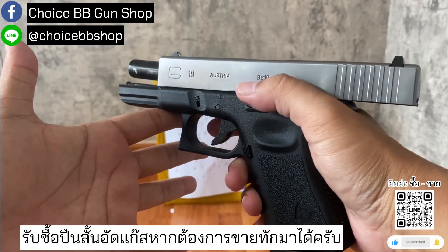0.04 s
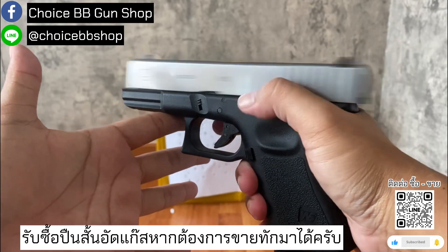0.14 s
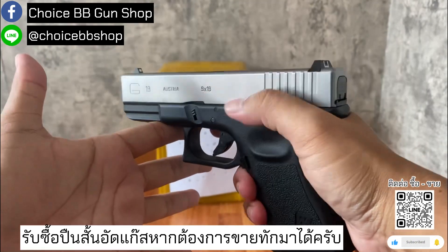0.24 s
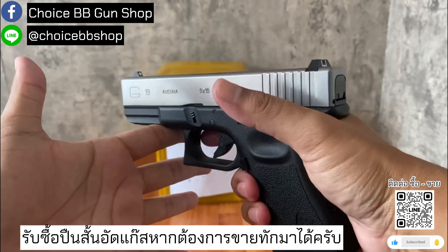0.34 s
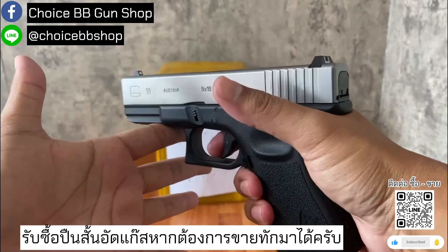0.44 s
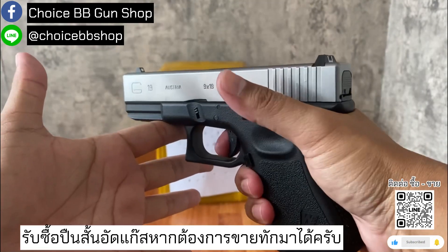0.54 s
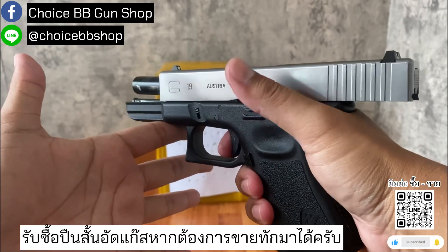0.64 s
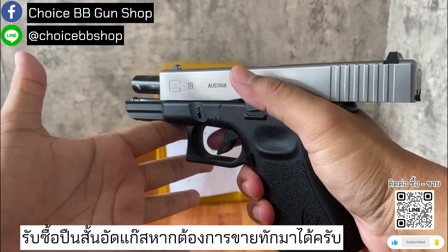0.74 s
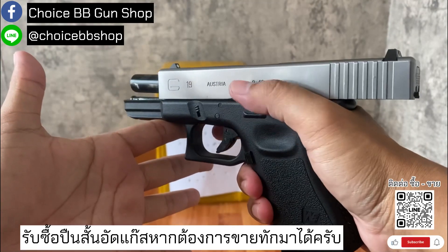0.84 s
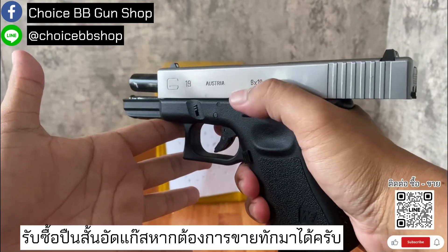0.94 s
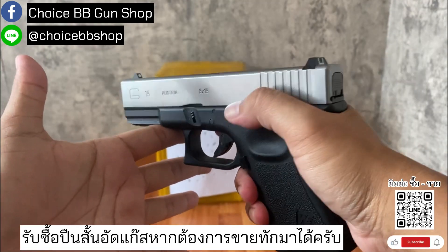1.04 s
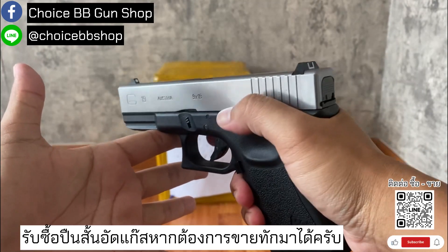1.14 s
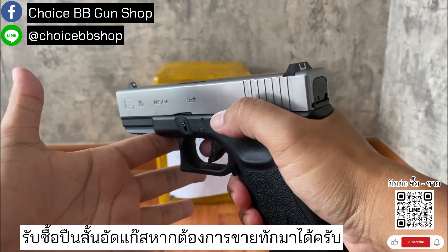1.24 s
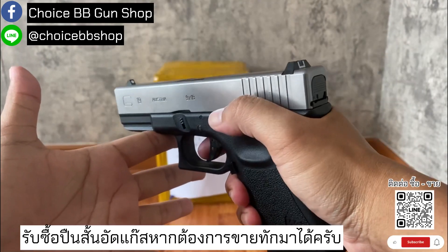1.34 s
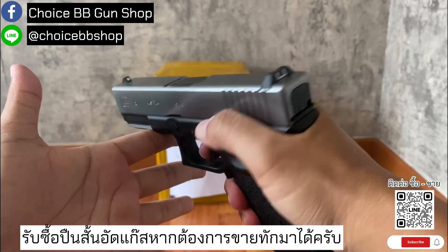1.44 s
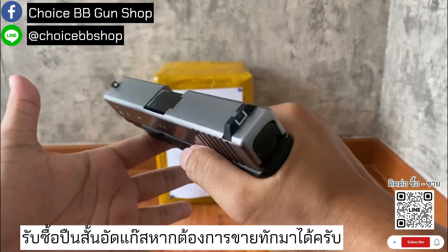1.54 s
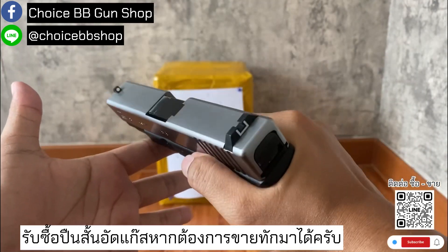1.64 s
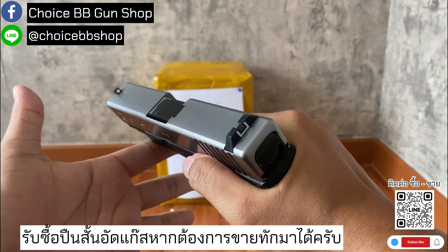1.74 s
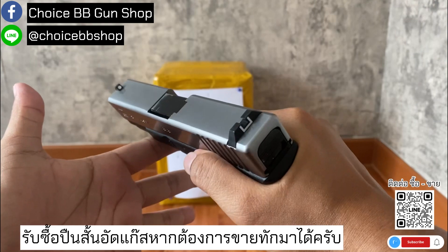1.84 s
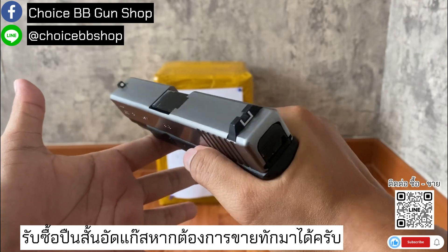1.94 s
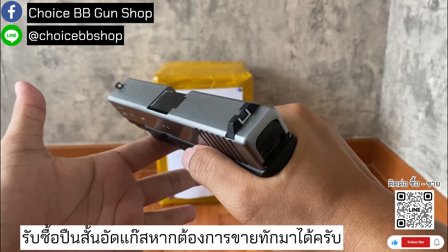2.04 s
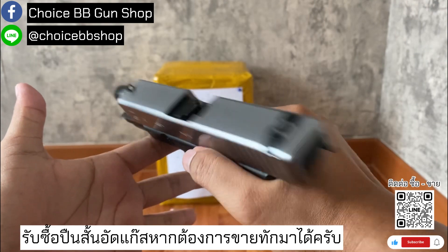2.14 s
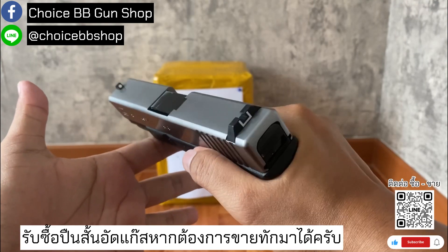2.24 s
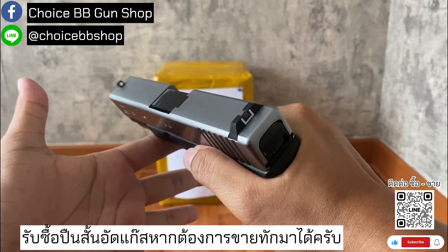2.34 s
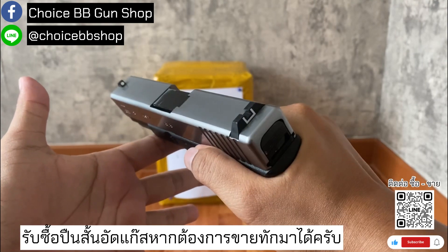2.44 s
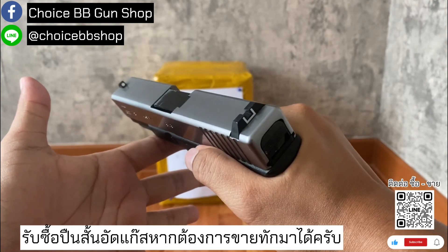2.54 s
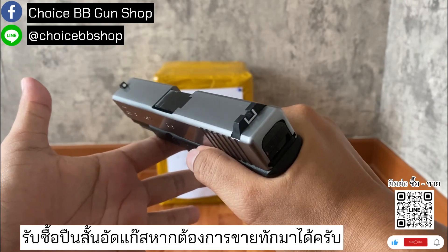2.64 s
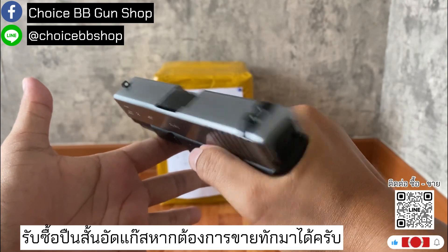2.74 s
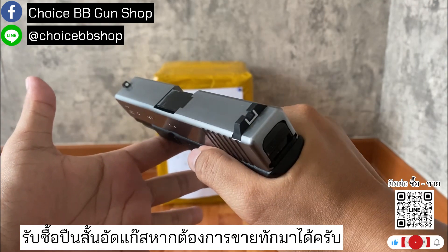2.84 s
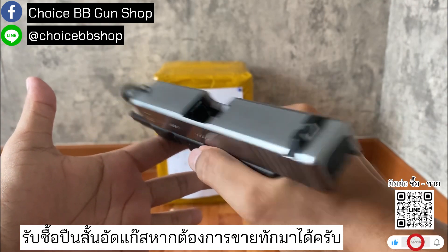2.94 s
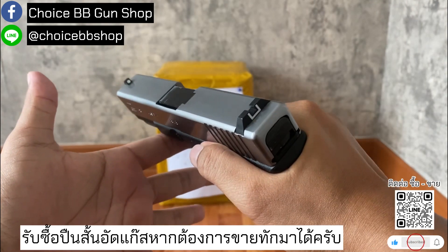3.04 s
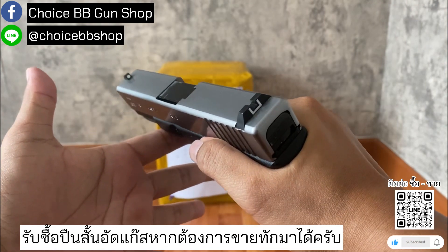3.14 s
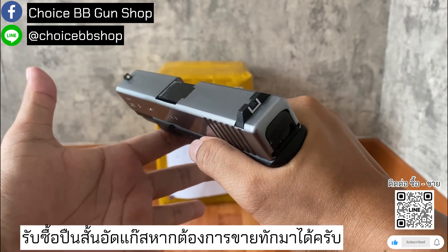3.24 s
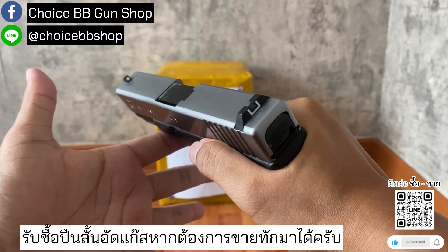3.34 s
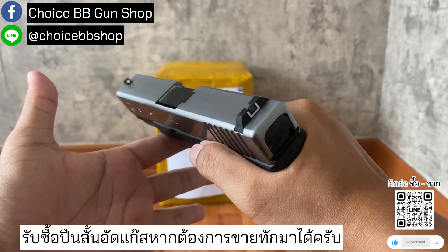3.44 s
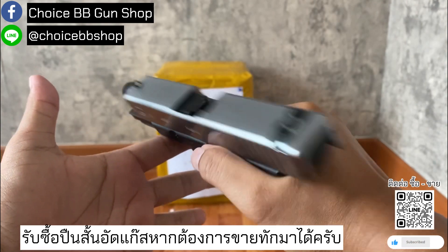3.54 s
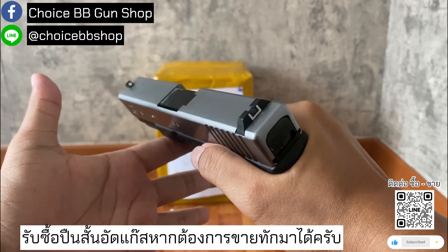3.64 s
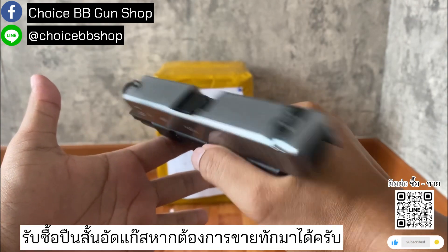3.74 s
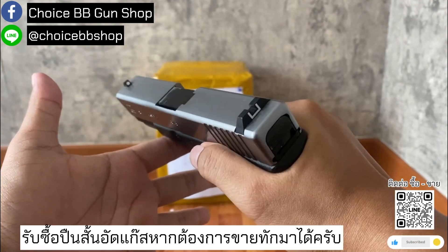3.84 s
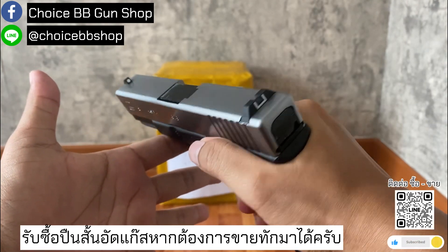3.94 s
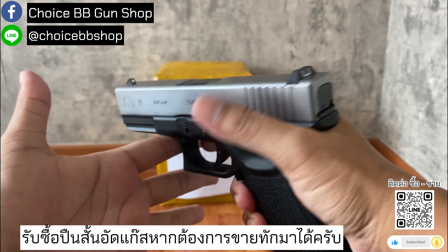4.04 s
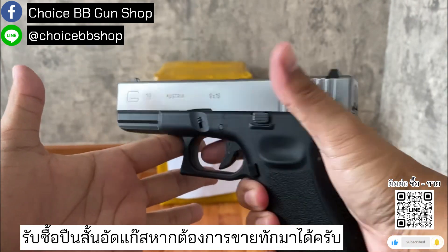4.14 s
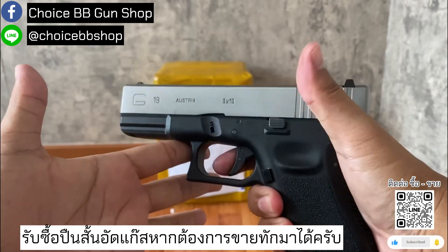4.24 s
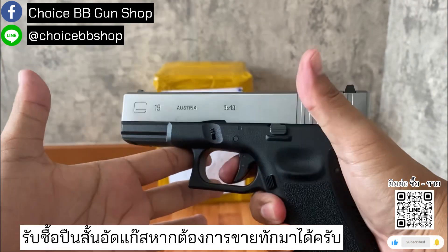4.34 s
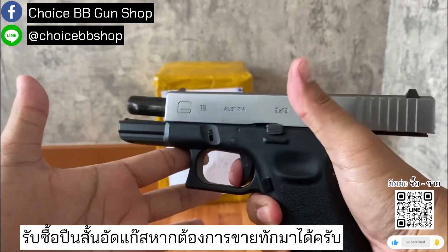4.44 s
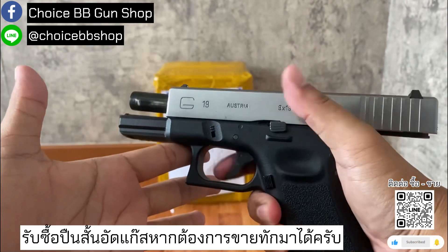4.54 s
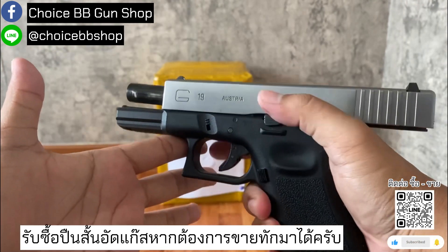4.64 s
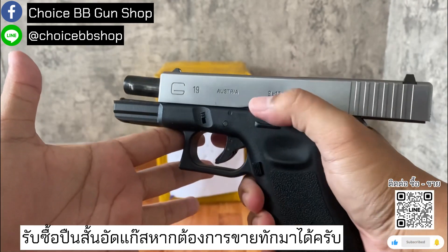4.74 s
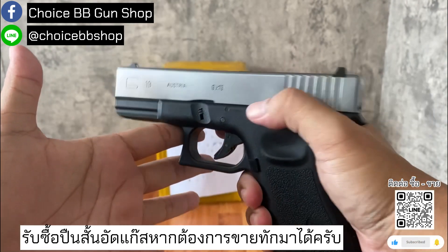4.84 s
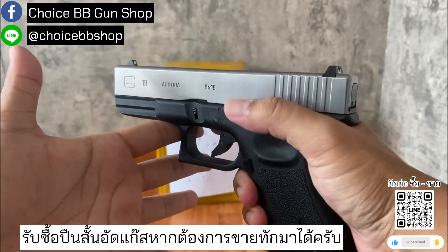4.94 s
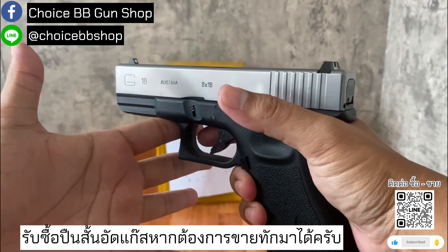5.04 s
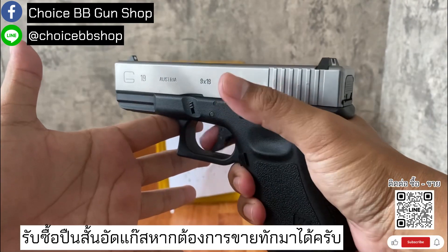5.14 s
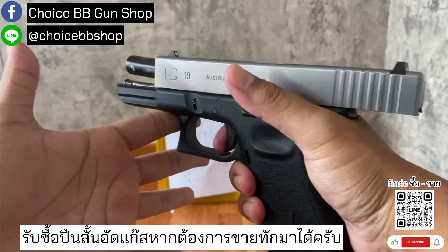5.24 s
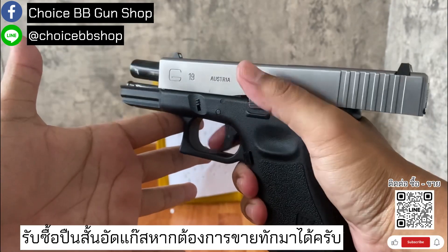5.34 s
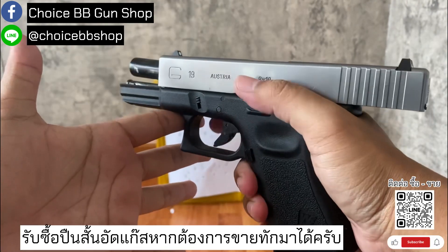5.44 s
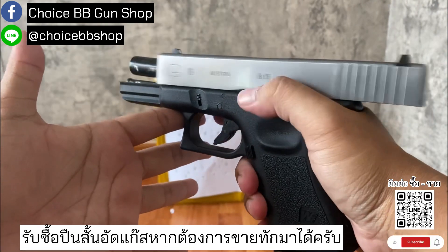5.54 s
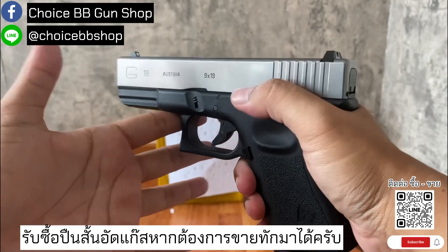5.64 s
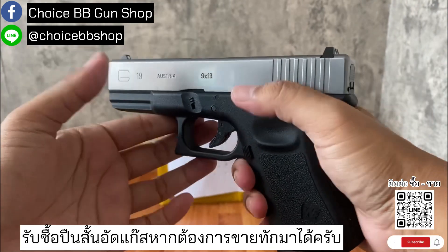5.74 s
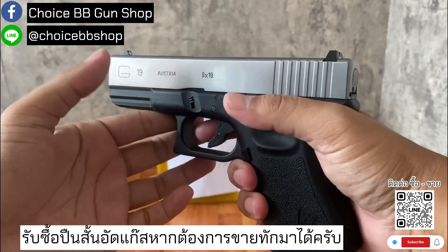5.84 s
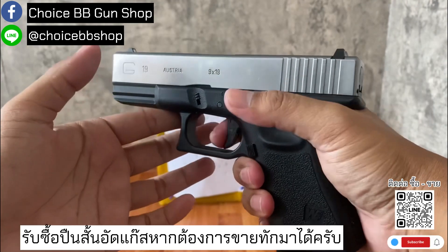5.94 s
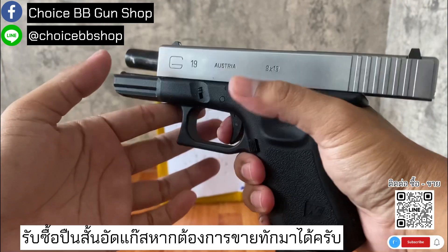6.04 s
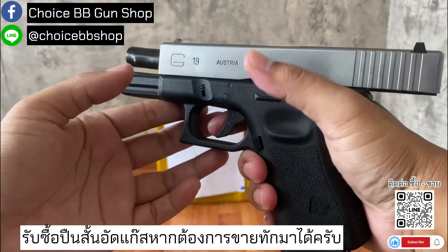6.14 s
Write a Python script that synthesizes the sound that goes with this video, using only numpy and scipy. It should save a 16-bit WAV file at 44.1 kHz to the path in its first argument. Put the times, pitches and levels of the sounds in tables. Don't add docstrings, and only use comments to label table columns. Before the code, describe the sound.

Very close and loud enough to overload, a gas pistol pops sharply, its metal slide clattering back and forth. A hand-released slide clacks, one shot cracks, the slide is freed again, then six shots come in fast pairs with ringing metal returns. Three more shots follow, the slide locking back and being released between them. A cardboard box resonates dully underneath, with trigger ticks, low puffs of moving air and a short bright room tail.

```python
import sys
import numpy as np
from scipy import signal
from scipy.fft import rfft, irfft, next_fast_len
from scipy.io import wavfile
from scipy.ndimage import uniform_filter1d

SR = 44100
rng = np.random.default_rng(int(sys.argv[2]) if len(sys.argv) > 2 else 0)


def gain_from_decibels(decibels):
    exponent = np.asarray(decibels, float) / 20
    return 10 ** exponent


def transcribe(u):
    v = np.clip(np.atleast_2d(u).T, -1, 1)
    q = np.round(v * 32767).astype(np.int16)
    wavfile.write(sys.argv[1], SR, q)


N = 272979

# arrives_s, lasts_s, puffs_db, sway_db
GUSTS = [(0.029, .07, -64.5, -62), (0.751, .26, -42.5, -46), (1.18, .01, -52, -48), (1.34, .04, -58, -62),
         (1.8, .05, -61, -72), (3.38, .1, -54, -57), (3.84, .16, -50.5, -52), (4.547, .12, -56, -51.5),
         (4.95, .12, -75, -52.5), (5.636, .26, -44.5, -48), (6.095, .1, -48, -52.5)]
# freq_hz, level_db
PUFFS_COLOUR = [(30, -28), (60, 1), (90, 3.5), (140, -3), (220, -19), (400, -36), (700, -48)]
# freq_hz, level_db
SWAY_COLOUR = [(18, -25.5), (35, 0), (50, 8), (70, 9.5), (100, -56.5)]
# freq_hz, level_db
HUSH_COLOUR = [(100, 0), (500, -11.5), (1000, -25), (2000, -21.5), (5000, -19.5), (12000, -24.5),
               (15500, -39)]
# pitch_hz, level_db, t60_s
CARTON = [(92, -26, .7), (122, -9, .1), (199, -34, .8), (277, -28, .7), (301, -19, .36), (339, -24.5, 1.0),
          (406, -22.5, .64), (454, -24, .3), (531, -21, .3), (608, -22, .17), (431, -22, .2)]
# start_s, snap_db, first_rail_tick_db, second_rail_tick_db
RELEASES = [
    (0.1225, -13, -14, -10.5),
    (0.9664, -10, -9, -8),
    (4.8106, -10.5, -15, -14.5),
    (5.553, -6.5, -14.5, -14.5),
]
# start_s, blow_db, rattle_db, ring_db, thud_db
SLAMS = [
    (0.1562, -0.5, -13, -20, -35),
    (1.004, -3.5, -3.5, -9.5, -26),
    (1.9312, 1, -1.5, -8.5, -31),
    (2.1753, -5.5, -9, -8, -32.5),
    (2.751, 1, -8.5, -6, -23.5),
    (2.9797, 1.5, -7, -13, -35.5),
    (3.5685, 0.5, -11.5, -14.5, -29),
    (3.7678, 0, -8.5, -9.5, -28),
    (4.8434, -2.5, -3.5, -10, -23.5),
    (5.5857, -4.5, -2, -14, -25),
]
# freq_hz, level_db
FIRED_CLACK = [(300, -29), (1200, -18.5), (2050, -5.5), (2500, -14.5), (3700, -10), (4300, 2), (5300, -4),
               (6600, -1), (8500, -7), (11300, -1.5), (14500, -9.5), (17000, -36)]
# freq_hz, level_db
FREED_CLACK = [(300, -27), (800, -14.5), (1400, -2.5), (2000, -4.5), (2600, -2.5), (3500, -7), (4400, -4),
               (5500, -3), (7000, 0), (11000, 0.5), (14500, -8.5), (17000, -34.5)]
# pitch_hz, level_db, t60_s
FIRED_RING = [(1950, -19, .75), (2090, -6, .22), (2610, -9, .15), (3900, -18, .65), (4250, -19, .7),
              (4330, -7, .3), (4370, -8, .45), (2380, -22, .6), (6550, -4, .2), (7270, -5, .13),
              (11280, -4, .1)]
# pitch_hz, level_db, t60_s
FREED_RING = [(2090, -10, .2), (2610, -9, .15), (4290, -11, .4), (4320, -10, .48), (4365, -10, .4),
              (4440, -11, .35), (6700, 2, .05), (7230, 0, .06), (11300, 2, .04)]
# pitch_hz, level_db, t60_s
CATCH_RING = [(6900, 0, .012), (7400, -4, .01), (11000, -8, .008)]
# start_s, level_db, slope_db_per_octave, t60_s
TICKS = [(0.4405, -22, -0.5, 0.016), (0.484, -39, -8, 0.016), (0.531, -38.5, -5, 0.027),
         (1.3947, -22.5, -2, 0.019), (1.646, -56.5, -11, 0.03), (1.7705, -34, -3, 0.013),
         (3.489, -39.5, -5, 0.018), (3.998, -22, -0.5, 0.011), (4.3835, -40, -6.5, 0.013),
         (4.4023, -20, -4, 0.012), (4.956, -55.5, -6, 0.024), (5.1628, -24.5, -2.5, 0.024),
         (5.1932, -34, 10, 0.0058), (5.9333, -20, -2.5, 0.015), (5.952, -55.5, -7.5, 0.024),
         (5.9712, -31.5, -12, 0.027)]
# start_s, gas_rush_db, low_push_db, rear_stop_db
SHOTS = [
    (.5729, 2, -5, -6.5),
    (1.8781, 1.5, -6.5, -6),
    (2.1141, 0.5, -6.5, -4.5),
    (2.7012, 1, -5.5, -6),
    (2.9298, 0.5, -6, -9.5),
    (3.518, -0.5, -7, -13.5),
    (3.7166, 0, -6.5, -14),
    (4.4144, 2, -5, -10),
    (5.2079, 2.5, -5, -5),
    (5.9866, 0.5, -5, -6),
]
# freq_hz, level_db
GAS_COLOUR = [(300, -17), (900, -3), (2000, -2), (4000, -2), (7000, -2), (10000, -1.5), (14000, -4),
              (16000, -21), (17500, -31.5)]
# freq_hz, t60_s
ROOM = [(150, 0.7), (500, 0.42), (1500, 0.51), (4000, 0.46), (8000, 0.39), (15500, 0.32), (16200, 0.069)]
# freq_hz, likeness_0_to_1
SAME = [(60, 0.86), (300, 0.92), (700, .9), (1200, 0.28), (1700, 0.57), (3000, 0.38), (4300, 0.57),
        (5500, 0.21), (6900, 1)]
# freq_hz, lead_rad
LEAD = [(200, 0), (860, .6), (1200, 1.3), (1900, .5), (2700, 1.1), (4200, .1), (6400, .35), (6900, 0)]
# freq_hz, difference_db
TILT = [(60, 0.0), (110, 0.0), (200, 0.0), (380, -0.5), (700, 0.0), (1290, 1.0), (2380, 2.0), (4400, 3.5),
        (8120, 0.5), (15000, 0.0)]

HUSH_DB, STILL_PUFFS_DB, STILL_SWAY_DB = -77, -76, -72.5
GUST_RISE_DB_PER_S, GUST_FALL_DB_PER_S = 220, 110
WAKE_S, WAKE_LASTS_S, WAKE_PUFFS_DB, WAKE_SWAY_DB = .07, .14, -54, -62
BLOW_T60_S, TIGHTER_S_PER_DB = 0.043, 0.0064
PORT_SHARES = np.array([[1], [.15]])
STEPS_FROM_HZ, STEP_HZ = 6900, 2120


def read(points, hz):
    f, value = np.transpose(points)
    return np.interp(np.log(hz + 1), np.log(f + 1), value)


def add(mix, start_s, sound):
    part = mix[..., round(start_s * SR):][..., :sound.shape[-1]]
    part += sound[..., :part.shape[-1]]


def colour(x, points):
    log_gain = np.log(gain_from_decibels(read(points, abs(np.fft.fftfreq(4096, 1 / SR)))))
    taps = np.fft.ifft(np.exp(np.conj(signal.hilbert(log_gain)))).real[:2048]
    return signal.oaconvolve(x, taps[None], axes=1)[:, :x.shape[1]]


def burst(db, t60_s, rise_s=0.000067, hold_s=0., flutter=1.0):
    t = np.arange(6615) / SR
    noise = rng.standard_normal((3, 6615))
    flutter_db = flutter * uniform_filter1d(noise[2], size=36) * 6
    fall_db = 60 * np.maximum(t - hold_s, 0) / max(t60_s, .003)
    return gain_from_decibels(db + flutter_db - fall_db) * (1 - np.exp(-t / rise_s)) * noise[:2]


def ring(modes, spread, waver_db=0.):
    t = np.arange(SR) / SR
    total = np.zeros(SR)
    for hz, db, t60_s in modes:
        level_luck, pitch_luck = rng.standard_normal(2)
        waver = np.interp(t, np.arange(40) / 40, rng.standard_normal(40))
        level_db = db + 2 * level_luck + waver_db * waver - 60 * t / t60_s
        total += gain_from_decibels(level_db) * np.sin(2 * np.pi * hz * (1 + spread * pitch_luck) * t)
    return PORT_SHARES * total


def push(hz, sag_s, t60_s, lead_s=0.003):
    t = np.arange(4000) / SR - .005
    turns = hz * (np.minimum(t, 0) + sag_s * np.log(1 + np.maximum(t, 0) / sag_s))
    late = t - .0005
    swell = np.exp(np.minimum(late, 0) / lead_s)
    return PORT_SHARES * np.cos(2 * np.pi * turns) * gain_from_decibels(-60 * np.maximum(late, 0) / t60_s) * swell


def air():
    wakes = [(row[0] + WAKE_S, WAKE_LASTS_S, WAKE_PUFFS_DB, WAKE_SWAY_DB) for row in SHOTS]
    start_s, lasts_s, puffs_db, sway_db = np.transpose(list(GUSTS) + wakes)[:, :, None]
    t, every = np.arange(0, N, 64) / SR, np.arange(N) / SR
    rise_db = -GUST_RISE_DB_PER_S * np.maximum(start_s - t, 0)
    fall_db = -GUST_FALL_DB_PER_S * np.maximum(t - start_s - lasts_s, 0)
    shape_db = rise_db + fall_db
    lumps = uniform_filter1d(uniform_filter1d(rng.standard_normal(N), 900), 900)
    lumps_db = 4 * lumps / lumps.std()
    sway = colour(rng.standard_normal((2, N)), SWAY_COLOUR)
    puffs = colour(rng.standard_normal((2, N)), PUFFS_COLOUR)
    hush = colour(rng.standard_normal((2, N)), HUSH_COLOUR)
    sway_gain = gain_from_decibels(STILL_SWAY_DB) + gain_from_decibels(sway_db + shape_db).max(0)
    puffs_gain = gain_from_decibels(STILL_PUFFS_DB) + gain_from_decibels(puffs_db + shape_db).max(0)
    sway *= np.interp(every, t, sway_gain) / sway.std()
    puffs *= np.interp(every, t, puffs_gain) * gain_from_decibels(lumps_db) / puffs.std()
    return sway + puffs + gain_from_decibels(HUSH_DB) * hush / hush.std()


def earlier_shot():
    low = np.zeros((2, N))
    add(low, 0, gain_from_decibels(-18.5) * ring(CARTON, 0.0019, 2)[:, 18000:])
    return low


def catch_releases():
    clicks, rings = np.zeros((2, 2, N))
    for start_s, snap_db, first_db, second_db in RELEASES:
        snap_s = start_s + .0006
        add(clicks, snap_s, burst(snap_db + 1, .014, rise_s=.0006))
        add(rings, snap_s + .0006, gain_from_decibels(snap_db - 5) * ring(CATCH_RING, .01))
        add(clicks, start_s + .0124, burst(first_db - 4, .012))
        add(clicks, start_s + .0198, burst(second_db - 6, .014, rise_s=.0004))
        add(clicks, start_s + .0228, burst(second_db - 4, .012))
    return colour(clicks, FREED_CLACK), rings


def slide_slams():
    fired, freed, tones = np.zeros((3, 2, N))
    thud = push(350, sag_s=.004, t60_s=.09)
    for start_s, blow_db, rattle_db, ring_db, thud_db in SLAMS:
        let_go = any(0 < start_s - row[0] < .05 for row in RELEASES)
        hits = freed if let_go else fired
        add(hits, start_s - .002, burst(blow_db - 29.5, 0.083, rise_s=0.002))
        blow_t60_s = BLOW_T60_S - TIGHTER_S_PER_DB * blow_db - 0.012 * let_go
        add(hits, start_s, burst(blow_db, blow_t60_s))
        for delay_s, less_db in ((.003, 0), (.0075, -1), (.0105, -5)):
            add(hits, start_s + delay_s, burst(rattle_db - 3.5 + less_db, 0.02))
        if let_go:
            tone = ring(FREED_RING, 0.003, waver_db=4)
        else:
            tone = ring(FIRED_RING, 0.0015, waver_db=1.5)
        add(tones, start_s, gain_from_decibels(ring_db - 20.5) * tone)
        add(tones, start_s - .001, gain_from_decibels(thud_db + 2) * thud)
    return colour(fired, FIRED_CLACK) + colour(freed, FREED_CLACK), tones


def trigger_scrape():
    scrape = np.zeros((2, N))
    for start_s, *_ in SHOTS:
        swell = burst(0, .045, flutter=3)[:, ::-1]
        add(scrape, start_s - .15, gain_from_decibels(-23.5) * swell)
    return colour(scrape, [(400, -13.5), (1200, 4.5), (3500, -1.0), (6000, -8.5), (8000, -34)])


def ticks():
    out = np.zeros((2, N))
    for start_s, db, slope_db, t60_s in TICKS:
        tone = [(600, -31.5 - 1.3 * slope_db), (1200, -3.5 - 2 * slope_db), (5000, -2),
                (14000, 1.5 * slope_db + 4.5), (17000, -34)]
        add(out, start_s, colour(burst(db - 3, t60_s), tone))
    return out


def gas_shots():
    gas = np.zeros((2, N))
    for start_s, rush_db, _, stop_db in SHOTS:
        add(gas, start_s - .009, burst(-44, 0.023))
        add(gas, start_s - .0045, burst(-21, 0.083, rise_s=0.001, flutter=2.5)[:, :220])
        add(gas, start_s, burst(2.0, 0.022, rise_s=0.0001))
        add(gas, start_s + .002, burst(rush_db - 2.5, .023, rise_s=.001, hold_s=.0075, flutter=2.5))
        add(gas, start_s + .0186, burst(stop_db + 3, .016, rise_s=.0005))
    return colour(gas, GAS_COLOUR)


def low_pushes():
    low = np.zeros((2, N))
    muzzle = push(430, sag_s=.1, t60_s=.0047, lead_s=.0007)
    breech = push(500, sag_s=.005, t60_s=.016, lead_s=.0007)
    carton_rise = 1 - np.exp(-np.arange(SR) / 190.0)
    for start_s, _, push_db, _ in SHOTS:
        add(low, start_s - .0009, gain_from_decibels(push_db + 5) * muzzle)
        add(low, start_s + .0059, gain_from_decibels(push_db + 2.5) * breech)
        add(low, start_s + .008, gain_from_decibels(push_db - 3.0) * ring(CARTON, .001, 1.5) * carton_rise)
    return low


def room(x):
    hz, t, z = signal.stft(rng.standard_normal((2, SR)), SR, nperseg=256)
    fall = gain_from_decibels(-60 * t / read(ROOM, hz)[:, None])
    tail = signal.istft(z * fall, SR, nperseg=256)[1][:, :SR]
    tail *= 1 - np.exp(-np.arange(SR) / 100.0)
    return signal.fftconvolve(x, tail / np.linalg.norm(tail[0]), axes=1)[:, :N]


def scene():
    stirred = air()
    low = earlier_shot()
    clicks, catch_tones = catch_releases()
    clacks, slide_tones = slide_slams()
    bright = clicks + clacks + trigger_scrape() + ticks() + gas_shots()
    low = low + low_pushes()
    direct = bright + low + catch_tones + slide_tones
    return direct + gain_from_decibels(-11) * room(bright) + gain_from_decibels(-16.5) * room(low) + stirred


def roll_off(x):
    return signal.sosfilt(signal.butter(12, 16610, fs=SR, output="sos"), x)


def record(dry):
    size = next_fast_len(N + 4096)
    hz = np.fft.rfftfreq(size, 1 / SR)
    bass_loss = hz ** 4 / (hz ** 4 + 11.0 ** 4)
    shared, own = rfft(dry, size) * bass_loss
    steps = np.pi * np.clip((hz - STEPS_FROM_HZ) / STEP_HZ, 0, 4)
    lag_rad = steps - .42 * np.sin(2 * steps)
    same = np.clip(read(SAME, hz) - 0.12 * np.sin(steps) ** 2, 0, 1)
    turn = gain_from_decibels(read(TILT, hz) / 2) * np.exp(.5j * (read(LEAD, hz) - lag_rad))
    left = shared * turn
    right = (same * shared + np.sqrt(1 - same ** 2) * own) / turn
    ports = irfft(np.array([left, right]), size)[:, :N]
    mix = np.clip(ports, -.99, .99)
    return roll_off(mix)


dry = scene()
out = record(dry)
transcribe(out)
```